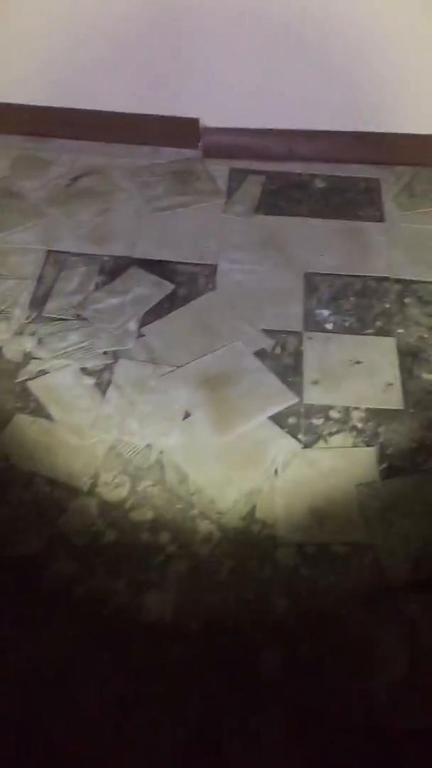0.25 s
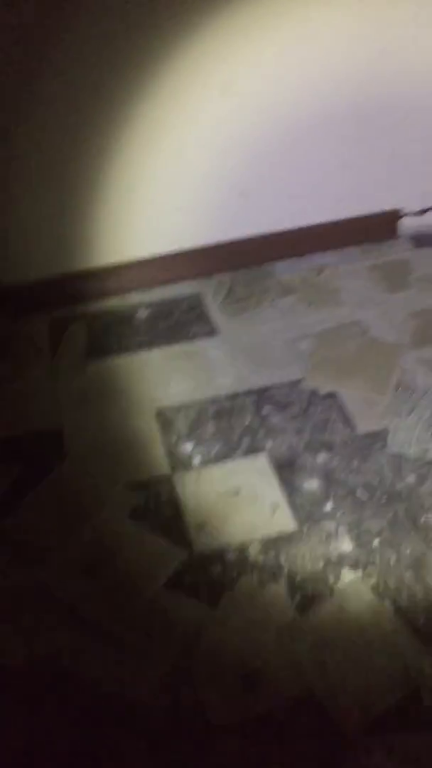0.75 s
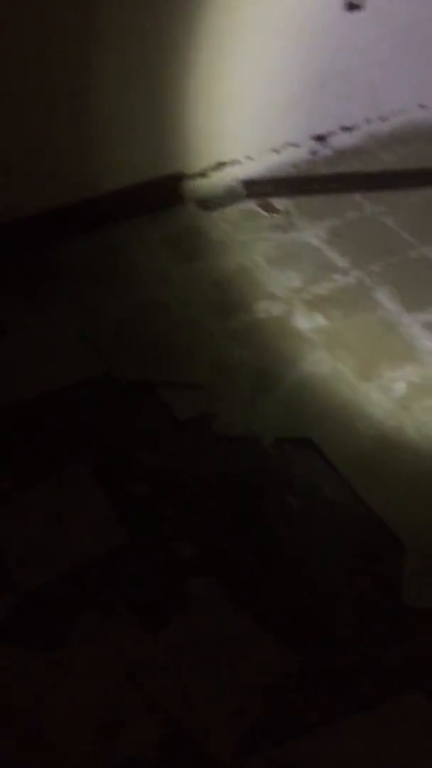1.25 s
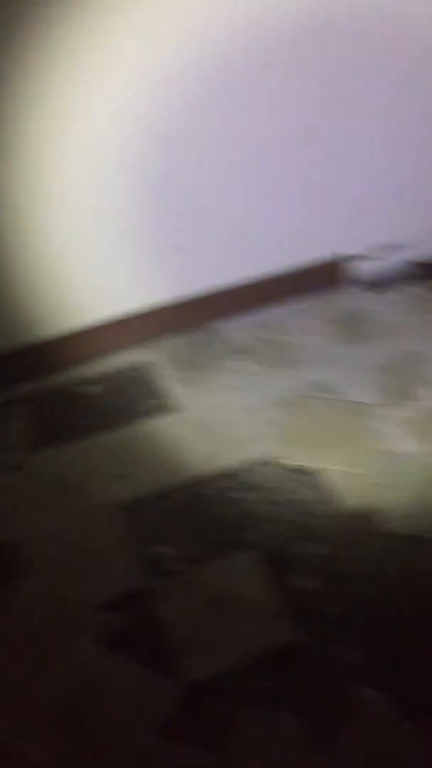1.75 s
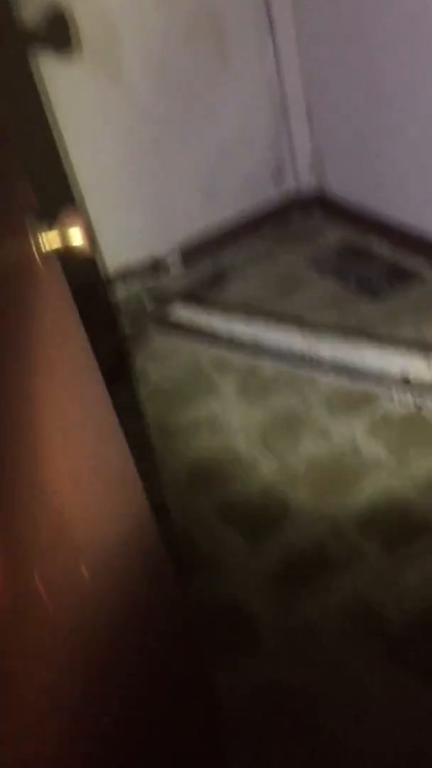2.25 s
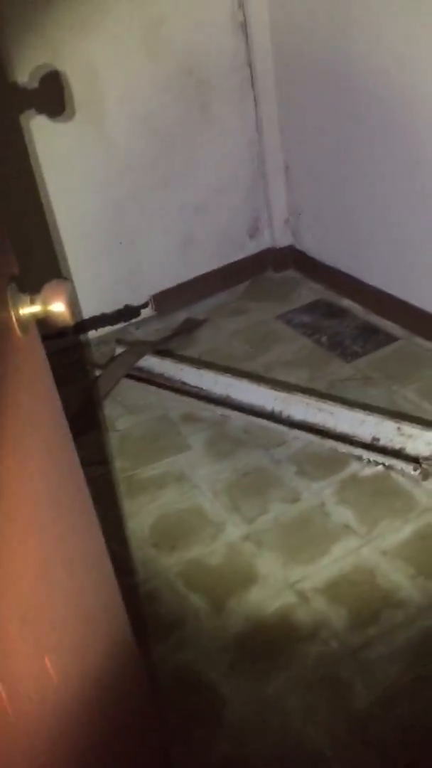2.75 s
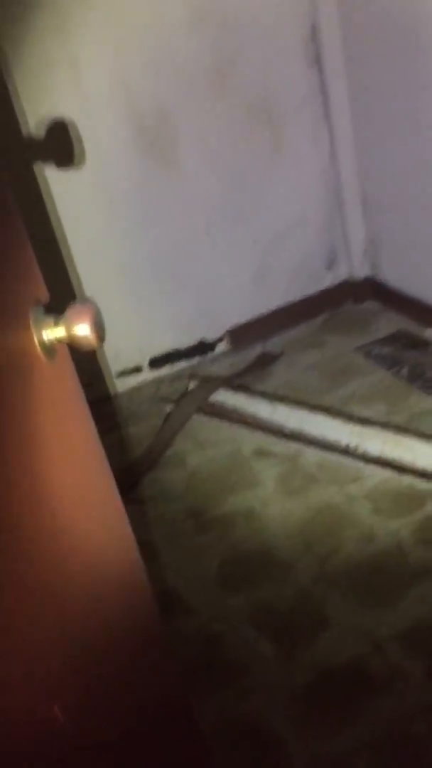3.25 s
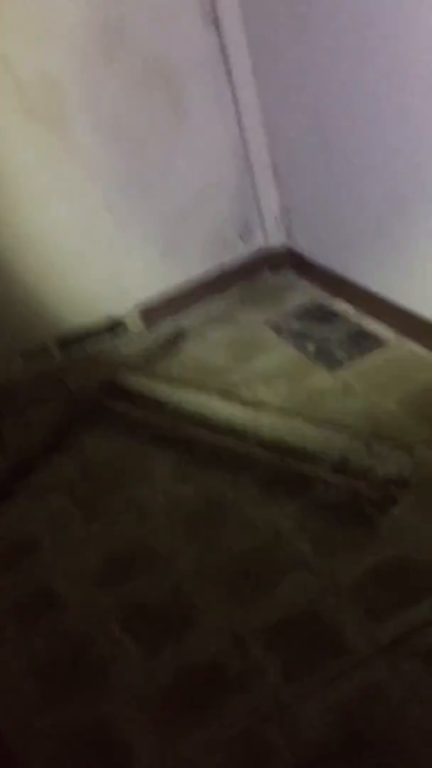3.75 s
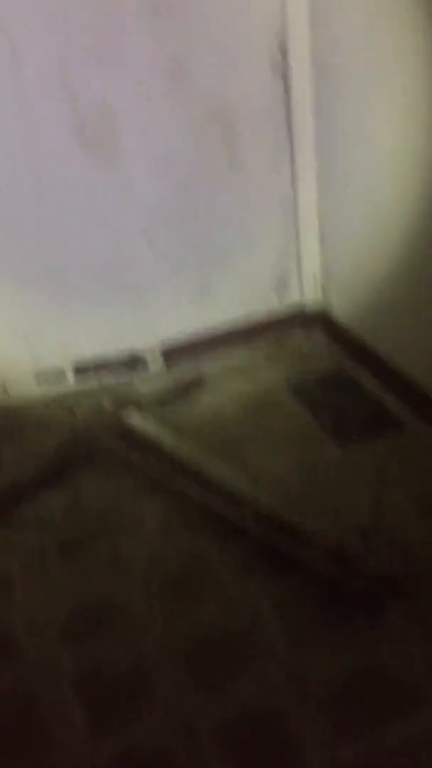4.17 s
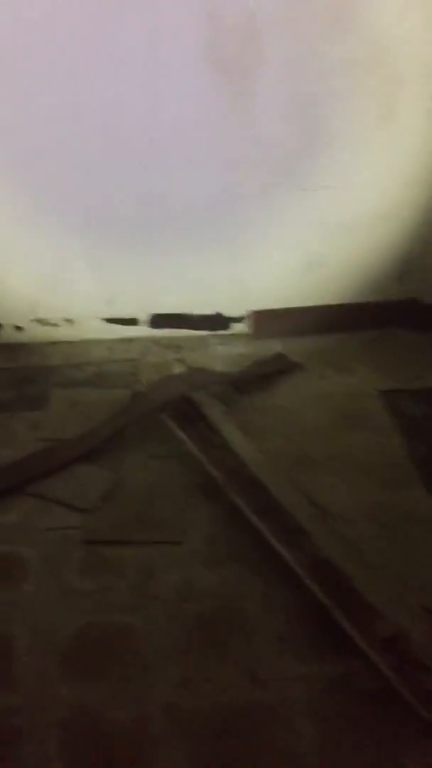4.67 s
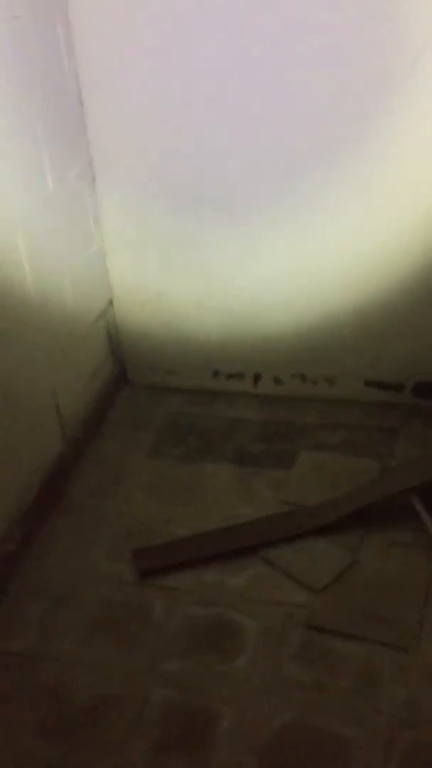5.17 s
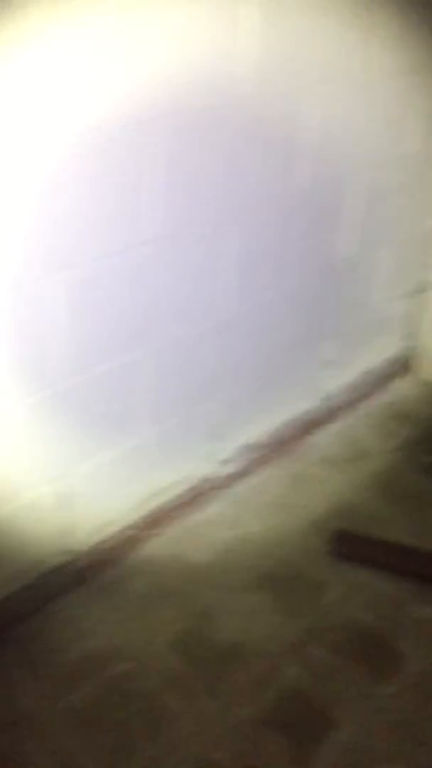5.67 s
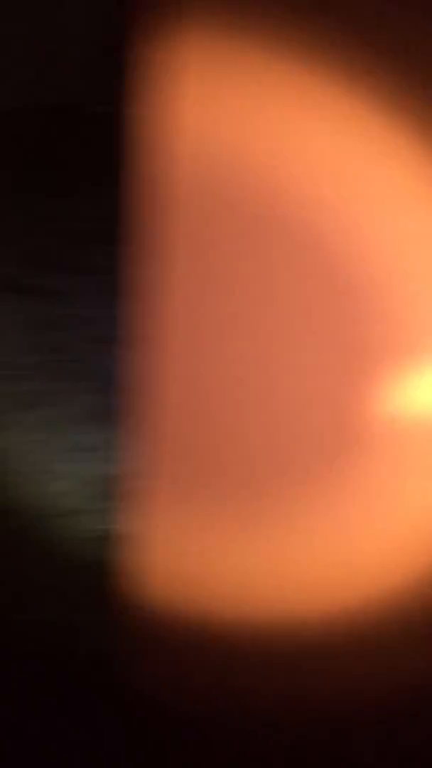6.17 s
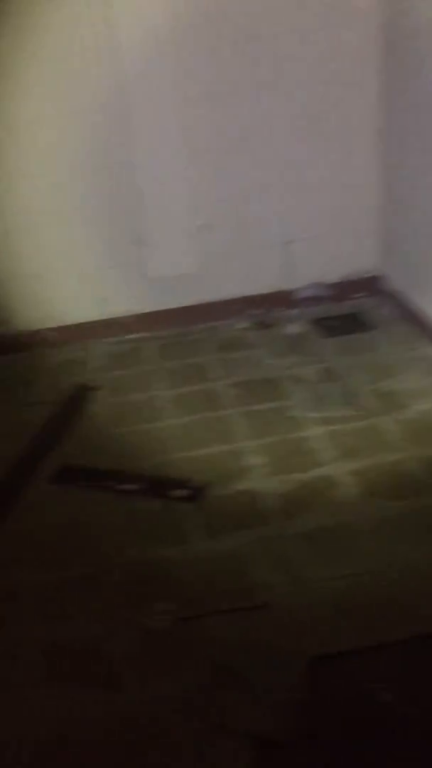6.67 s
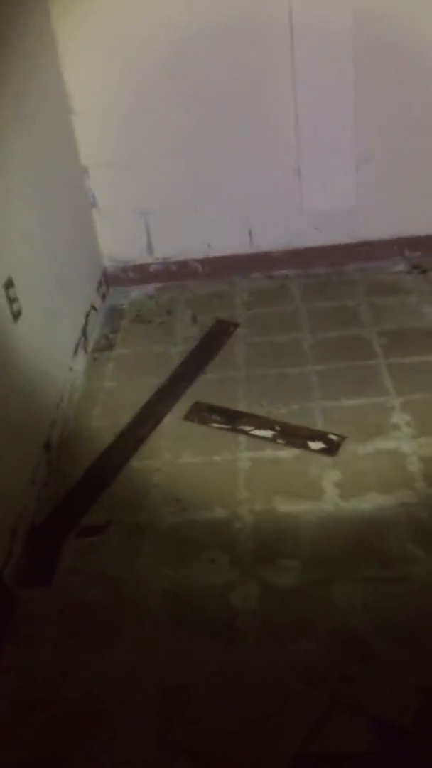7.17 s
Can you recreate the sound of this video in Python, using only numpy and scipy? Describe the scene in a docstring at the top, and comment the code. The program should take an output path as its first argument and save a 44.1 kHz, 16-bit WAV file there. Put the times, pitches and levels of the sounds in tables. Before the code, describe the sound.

Near-field footsteps on loose brittle tiles in bare, echoing rooms, over faint hiss and low rumble. At the start a sole scuffs briefly and a small shard clinks near 0.1 s. A modest clack comes at 0.4 s, then small clicks lead to a loud, sharp tile snap with a hollow heel knock at 0.8 s, its echo fading. A soft low thud falls around 1.65 s. Until about 3.6 s it is nearly still, with a faint hollow drone near 3 s. Light gritty shuffles follow at 3.6-3.9 s. From 4.4 to 4.65 s tiles crack in a dense crunching burst, with another strong clack at 5.0 s and low hand rumble. Scrapes and smaller snaps cluster at 5.4-5.8 s, then again at 6.25-6.9 s. Grit whispers quietly before a last scuff and deep thud at 7.4 s. The later echoes are shorter, suggesting a smaller room.

```python
"""Footsteps on broken tiles

Someone walks over loose brittle tiles and grit in bare, echoing rooms, stops a while and walks on.
Tiles snap and clack as ringing bursts, soles drag through random grit clicks, heels thud as short low tones.
A small shard clinks, bare walls answer with dying noise, and rumble, a faint drone and hiss lie beneath."""
import sys
import numpy as np
from scipy import signal
from scipy.fft import rfft, irfft
from scipy.io import wavfile
from scipy.ndimage import uniform_filter1d

SR = 44100
rng = np.random.default_rng(int(sys.argv[2]) if len(sys.argv) > 2 else 0)


def unload_wav(signal):
    """Save mono or channel-first audio to the path in sys.argv[1] as 16-bit WAV at rate SR, clipped to [-1, 1]."""
    wavfile.write(
        sys.argv[1],
        SR,
        np.round(np.clip(np.atleast_2d(signal).T, -1, 1) * 32767).astype(np.int16),
    )


def ratio(d):
    """dB to gain"""
    e = np.asarray(d, float) / 20
    return 10 ** e


N = 327212  # length in samples


def rms_one(x):
    """Scales a sound to an rms of one."""
    return x / np.sqrt(np.mean(x ** 2) + 1e-20)


def peak_one(x):
    """Scales a sound to a peak of one."""
    return x / np.max(np.abs(x))


def at_hz(points, hz):
    """Reads a table of (f/Hz, value) between its rows, along a logarithmic pitch scale."""
    table_hz, values = np.transpose(points)
    return np.interp(np.log(hz), np.log(table_hz), values)


def band(x, low_hz, high_hz):
    """Keeps only the sound between two frequencies."""
    sos = signal.butter(2, [low_hz, min(high_hz, .45 * SR)], "band", fs=SR, output="sos")
    return signal.sosfilt(sos, x)


def slow_noise(shape, top_hz):
    """Noise that wanders no faster than about top_hz."""
    sos = signal.butter(2, top_hz, fs=SR, output="sos")
    return signal.sosfilt(sos, rng.standard_normal(shape))


def ring(x, hz, cycles):
    """A mode that dies by 60 dB within the given number of cycles."""
    radius = ratio(-60 * hz / (cycles * SR))
    angle = 2 * np.pi * hz / SR
    return signal.lfilter([0, np.sin(angle)], [1, -2 * radius * np.cos(angle), radius ** 2], x + 1e-18)


def add(out, s, sound):
    """Mixes a short sound into a track at a time in seconds."""
    at = max(round(s * SR), 0)
    out[at:at + len(sound)] += sound[:N - at]


def swell(s, hold_s, db, rise, fall):
    """Gain that climbs to a level, holds it and dies, at steady rates in dB per second."""
    t = np.arange(N) / SR
    return ratio(db - rise * np.maximum(s - t, 0) - fall * np.maximum(t - s - hold_s, 0))


def hump(f, hz, octaves):
    """Power of a resonance with steep skirts; octaves sets how wide it is."""
    return 1 / (1 + (np.log2(f / hz) / octaves) ** 2 / 2) ** 4


def tile(force, power):
    """Colours a force by a power spectrum with the causal, minimum-phase response."""
    folded = irfft(.5 * np.log(power))
    half = len(folded) // 2
    folded[1:half] *= 2
    folded[half + 1:] = 0
    return irfft(np.exp(rfft(folded)) * rfft(force))


# tile snaps and clacks, strengths before the offsets in snaps():
# (t/s, level/dB, lower ring f/Hz, upper ring level/dB, bright crack level/dB)
TILE_SNAPS = [(0.034, -36, 1140, -1, -11), (0.087, -34.5, 4020, -20, 12), (0.094, -29, 1100, 12, -14),
              (0.421, -18, 1275, -23.5, -65), (0.442, -23, 1240, -28.5, -54.5), (0.715, -41, 1000, -3, -18),
              (0.729, -42, 3000, -8, 4), (0.752, -22.5, 1010, -2.5, -8), (0.763, -18, 1780, -2, -10),
              (0.787, -32, 2100, 6.5, -15), (0.822, 1, 1546, -4, -5), (1.639, -49.5, 813, -26, -31),
              (2.655, -52, 2003, -5, -15), (3.387, -46.5, 680, -20, -20), (3.39, -46.5, 2340, -20, -28),
              (3.595, -37.5, 1275, 1, -19), (3.69, -52, 1180, -18, -7.5), (4.134, -37, 2360, 19, -13),
              (4.399, -21.5, 1840, -8, 6), (4.423, -17.5, 1730, -14, 6), (4.461, -22.5, 1960, -13.5, -11),
              (4.486, -18.5, 2050, 7.5, -32), (4.504, -12, 1360, -3, -12), (4.537, -7.5, 1920, -22, -15),
              (4.541, -8.5, 1156, 7, -30), (4.587, -7, 1200, -13, 12), (4.61, -7, 1200, -20, -15),
              (4.615, -22, 1300, -20, -21), (4.911, -26.5, 1300, -7, 13), (4.987, -2.5, 1230, -1, -6),
              (4.992, -15, 722, -20, -28), (5.411, -35, 2010, -5, -2), (5.45, -31, 1210, -5, 12),
              (5.505, -25.5, 2110, -14.5, -8), (5.514, -29, 4000, -10, 3), (5.541, -22, 930, -7, 4),
              (5.575, -26, 800, -10, -5), (5.69, -34.5, 830, -20, -21), (5.728, -28.5, 1170, 10, 5),
              (5.801, -11, 1630, -3, -1), (5.81, -20, 2400, -6, -10), (6.253, -40, 1292, -21, -38.5),
              (6.326, -18, 1390, -4, -8), (6.334, -11.5, 1600, 0, -7.5), (6.421, -17, 1010, -20, -9),
              (6.439, -15.5, 1084, -14, 2), (6.505, -24.5, 890, -20, -18), (6.531, -21, 1420, -10, -2),
              (6.819, -30, 1460, -6.5, -4), (7.148, -49, 1230, 10, 5.5), (7.331, -46.5, 2250, -0.5, 1),
              (7.381, -32, 2140, -3, -4)]


def snaps():
    """A fracture shakes two modes of the tile; the sharper its crack, the more broad slap lies under them.
    Heard directly it tears for a few milliseconds; summed over all directions it is one smooth click."""
    upper_hz, crack_hz = 2783, 5800
    direct, spread, t = np.zeros(N), np.zeros(N), np.arange(2048) / SR
    f = np.linspace(0, SR / 2, 1025) + 10
    click = (t == 0) * 1.0
    for s, db, low_hz, high_db, crack_db in TILE_SNAPS:
        tear_s = .003 - .00016 * db  # weak fractures crumble longer
        tear = rng.standard_normal(len(t)) * (1 - np.exp(-t / .0004)) * np.exp(-t / tear_s)
        power = hump(f, low_hz, octaves=0.46)
        # sharp cracks add a narrow ring
        power += ratio(.15 * crack_db + 5.5) ** 2 * hump(f, low_hz, octaves=0.095)
        power += ratio(high_db - 6.5) ** 2 * hump(f, upper_hz, octaves=0.37)
        power += ratio(crack_db - 7) ** 2 * hump(f, crack_hz, octaves=0.37)
        # broad slap between the two rings
        power += ratio(0.63 * crack_db - 1.5) ** 2 * hump(f, np.sqrt(low_hz * upper_hz), octaves=1.66)
        # strong snaps are nearer: more direct sound
        direct_db = db + 6.5 + 0.14 * db
        add(direct, s - .001, ratio(direct_db) * peak_one(tile(tear, power)))
        add(spread, s, ratio(db - 12.5) * rms_one(tile(click, power)))
    return direct, spread


# heel weight on the floor, the knock relative to the push:
# (t/s, push level/dB, f/Hz, length/s, hollow knock level/dB)
HEEL_THUDS = [(0.422, -46, 161, 0.029, 14.5), (0.759, -48, 156, 0.047, 12), (0.819, -31, 203, 0.022, 16.5),
              (1.631, -44, 132, 0.043, -17.5), (1.689, -44, 156, 0.02, -9), (2.989, -66.5, 159, 0.027, 7.5),
              (3.639, -54, 59.2, 0.027, -3.5), (3.649, -51, 302, .02, 2), (3.697, -57.5, 303, .025, 0),
              (3.722, -52, 57.7, 0.026, -18), (3.929, -52, 65.8, 0.027, -21),
              (4.399, -51, 199, 0.017, 12.5), (4.459, -41, 185, 0.051, 12.5), (4.534, -36, 143, 0.028, 3.5),
              (4.984, -32.5, 184.3, 0.11, 20.5), (5.328, -40, 151, 0.038, 12),
              (5.499, -47.5, 146, 0.033, 6), (5.599, -37, 149, 0.009, -19),
              (5.814, -37.5, 199, 0.016, 10.5), (6.249, -45, 61, 0.037, -2.5), (6.325, -35.5, 80, 0.015, 4),
              (6.615, -66, 114, 0.027, -8), (7.234, -46, 56.7, 0.018, -16), (7.349, -44.5, 76, 0.027, -40),
              (7.374, -33.5, 66.5, 0.026, -14)]


def thuds():
    """A soft push gives a few low cycles, felt through the hand, and a hollow knock that fills the room."""
    low, knock, t = np.zeros(N), np.zeros(N), np.arange(8192) / SR
    click = (t == 0) * 1.0
    hollow = peak_one(band(band(click, 93, 640), 93, 640))
    for s, db, hz, length_s, knock_db in HEEL_THUDS:
        push = peak_one(t * np.exp(-2.5 * t / max(length_s, .005)))
        add(low, s, ratio(db) * push * np.sin(2 * np.pi * hz * t))
        add(knock, s, ratio(db + knock_db) * hollow)
    return low, knock


# soles dragging through grit, one row a stroke, the dust relative to the stroke:
# (start t/s, hold/s, level/dB, grain f/Hz, fine dust level/dB)
SOLE_DRAGS = [(0, 0.047, -48, 1440, -16.5), (0.719, 0.0085, -53.5, 1780, -3.5),
              (0.757, 0.0041, -28.5, 1840, -8), (3.172, 0.079, -73.5, 2023, 3),
              (3.615, 0.074, -54.5, 1400, -19), (3.688, 0.14, -61.5, 1520, 0), (4.408, 0.082, -39, 1910, 2),
              (4.538, 0.024, -26.5, 1590, 8), (4.6, 0.069, -45.5, 1400, 15.5),
              (5.389, 0.055, -44.5, 1506, -10), (5.531, 0.06, -39, 1410, -1), (5.615, 0.096, -50, 1310, -6),
              (6.254, 0.096, -46.5, 1300, -9), (6.34, 0.018, -24.5, 1870, -4),
              (6.382, 0.061, -35.5, 1530, 2), (6.507, .05, -40.5, 1330, 5.5),
              (6.579, 0.083, -46.5, 1640, 0.5), (6.732, 0.057, -46, 1440, -13),
              (6.804, 0.025, -40, 1600, -24), (6.846, 0.023, -58, 1620, 5.5), (7.072, 0.56, -71, 2000, 3.5),
              (7.38, .04, -45.5, 2310, -0.5)]


def drags():
    """Grit grains click at random and ring a few cycles near the grain pitch; dust hisses on top."""
    grains_per_s, lump_db, lump_top_hz = 2700, 1, 23
    grain_hz = np.geomspace(750, 6500, 14)
    grit_gain, dust_gain = np.zeros((14, N)), np.zeros(N)
    for s, hold_s, db, hz, dust_db in SOLE_DRAGS:
        stroke = swell(s, hold_s, db, rise=1499.5, fall=598.5)
        on = slice(max(round((s - .1) * SR), 0), round((s + hold_s + .2) * SR))
        near = ratio(-5.0 * np.abs(np.log2(grain_hz / hz)))  # grains far from the grain pitch are weaker
        grit_gain[:, on] += np.outer(near / np.linalg.norm(near), stroke[on])
        dust_gain += ratio(dust_db) * stroke

    sizes = ratio(3.2 * np.minimum(rng.exponential(1, N), 5)) * rng.choice([-1, 1], N)
    clicks = sizes * (rng.random(N) < grains_per_s / SR)
    dealt = rng.integers(0, 14, N)  # each click goes to one of the 14 pitches
    grit = np.zeros(N)
    for k, hz in enumerate(grain_hz):
        grit += grit_gain[k] * rms_one(ring(clicks * (dealt == k), hz, cycles=8.7))
    dust = rms_one(band(rms_one(clicks) + 0.99 * rng.standard_normal(N), 3500, 11000))
    lumps = rms_one(slow_noise(N, lump_top_hz))  # makes the drag uneven
    return ratio(lump_db * lumps) * (grit + dust_gain * dust)


# taps on a small hard shard: (t/s, level/dB)
SHARD_TAPS = [(.097, -23.5)]
# modes of the shard: (f/Hz, level/dB, time to die by 60 dB/s)
SHARD_MODES = [(1130, -3, .022), (2850, -.5, .014), (4100, -5, .014), (5900, -9, .014)]


def clink():
    """One tap sets all modes of the shard ringing."""
    taps = np.zeros(N)
    for s, db in SHARD_TAPS:
        taps[round(s * SR)] = ratio(db)
    return sum(ratio(db) * ring(taps, hz, cycles=hz * t60) for hz, db, t60 in SHARD_MODES)


# echo decay of the bare walls, before each room's share: (f/Hz, time to die by 60 dB/s)
WALL_DECAY = [(100, 1.1), (260, 2.1), (700, 1.61), (1840, 1.21), (4850, 1.127), (9500, 0.95), (14000, 0.6)]


def room(x, share):
    """Echoes thicken within milliseconds into noise that dies band by band; share scales the decay times."""
    t, tail = np.arange(2 * SR) / SR, 0
    edges = 60 * 2 ** np.arange(0, 8.6, .5)  # half octaves, in Hz
    white = rng.standard_normal((2, len(t)))
    for k, (low, high) in enumerate(zip(edges, edges[1:])):
        t60 = share * at_hz(WALL_DECAY, np.sqrt(low * high))
        tail = tail + band(white[k % 2], low, high) * ratio(-60 * t / t60)
    tail *= np.clip((t - .003) / .006, 0, 1)  # silent for 3 ms, then full within 6 ms
    return signal.fftconvolve(x, tail / np.sqrt(np.sum(tail ** 2)))[:N]


# low floor rumble: (t/s, level/dB)
FLOOR_LEVEL = [(0.06, -66), (.5, -88), (.82, -73), (1.45, -88.5), (2.2, -84.5), (3.4, -85.5), (3.9, -73),
               (4.35, -85.5), (4.67, -54.5), (4.95, -61), (5.13, -46), (5.3, -58), (5.64, -55.5),
               (5.74, -71), (5.85, -50.5), (6.05, -82), (6.4, -65), (6.95, -92), (7.42, -67.5)]
# the hand shifts on the microphone: (t/s, level/dB)
HAND_SHIFTS = [(.3, -77), (.8, -68), (1.45, -80), (3.74, -58), (3.93, -61), (4.44, -59.5), (4.67, -55),
               (5.05, -44), (5.45, -57), (5.64, -56), (5.85, -53), (6.32, -47), (6.46, -48), (6.63, -59),
               (6.88, -64), (7.23, -66), (7.39, -49.5)]
# a faint hollow drone: (t/s, level/dB)
DRONE_LEVEL = [(1.9, -77), (2.24, -77), (2.53, -79.5), (2.85, -68.5), (2.97, -68), (3.22, -78), (3.78, -72),
               (4.19, -78), (4.4, -76)]


def rumble():
    """Noise through a low resonance, deep noise from the hand below it and a narrow drone above."""
    floor_hz, drone_hz, hand_rest_db = 91, 352, -85.5
    t = np.arange(N) / SR
    wobble = slow_noise((2, N), 9.0)
    # a low tone whose strength and phase wander at random sounds like narrow noise
    tone = np.exp(2j * np.pi * floor_hz * t)
    floor = rms_one(np.real(tone * (0.021 + wobble[0] + 1j * wobble[1])))
    floor_gain = ratio(np.interp(t, *np.transpose(FLOOR_LEVEL)))

    hand = rms_one(band(rng.standard_normal(N), 43, 70))
    grip = ratio(hand_rest_db) + sum(swell(s, 0, db, rise=201.5, fall=250) for s, db in HAND_SHIFTS)

    drone = rms_one(ring(rng.standard_normal(N), drone_hz, cycles=75.0))
    drone_gain = ratio(np.interp(t, *np.transpose(DRONE_LEVEL), left=-90, right=-90))
    return floor_gain * floor + grip * hand + drone_gain * drone


# colour of still air and microphone hiss, relative density: (f/Hz, level/dB)
HISS_COLOUR = [(18, -35.5), (30, -6), (233, -1), (473, -9.5), (1040, -9.5), (1390, -10.5), (1910, -10),
               (4910, -18), (8980, -21), (10500, -23), (13700, -24), (14800, -30), (16000, -60.5)]
# distant murmur of the building swelling and fading, relative: (t/s, level/dB)
MURMUR_SWELL = [(0, 0.5), (1.8, 1.8), (2.3, -3), (2.7, 0.8), (3.3, 0.4), (4.3, 5), (6.998, -2.5),
                (7.42, 0.5)]


def quiet():
    """Half-octave bands of steady noise; the lower bands swell slowly."""
    typical_db = -67.5  # median sample height
    edges = 25 * 2 ** np.arange(0, 9.6, .5)
    white, out = rng.standard_normal((2, N)), 0
    swell_db = np.interp(np.arange(N) / SR, *np.transpose(MURMUR_SWELL))
    for k, (low, high) in enumerate(zip(edges, edges[1:])):
        hz = np.sqrt(low * high)
        band_db = at_hz(HISS_COLOUR, min(hz, 14000)) + swell_db / (1 + hz / 3000)
        out = out + ratio(band_db) * band(white[k % 2], low, high)
    return ratio(typical_db) * out / np.median(np.abs(out))


def scene():
    """Steps sound near at hand and echo from the room the walker is in; background lies under all."""
    doorway_s = 2.5
    low, knock = thuds()
    direct, spread = snaps()
    both = knock + drags() + clink()
    high_pass = signal.butter(4, 120, "high", fs=SR, output="sos")
    near, feed = signal.sosfilt(high_pass, [direct + both, spread + both])
    first = np.arange(N) < doorway_s * SR  # the walker moves on into a smaller room
    echo = ratio(-0.5) * room(feed * first, share=0.84)
    echo += ratio(-1) * room(feed * ~first, share=0.57)
    return (near + echo + low + rumble() + quiet())[None]


def gain_control(x, threshold_db, slope, release_db_per_s):
    """Loud sounds turn the gain down within tens of milliseconds; it creeps back at a steady rate."""
    power = uniform_filter1d(x ** 2, size=441, origin=220)  # mean over 10 ms
    level_db = 10 * np.log10(power + 1e-12)
    climb = release_db_per_s * np.arange(N) / SR
    wanted_db = slope * np.maximum(level_db - threshold_db, 0)
    cut_db = np.maximum.accumulate(wanted_db + climb) - climb
    r = np.exp(-1 / (0.036 * SR))  # smooths the cut over 36 ms
    return x * ratio(-signal.lfilter([1 - r], [1, -r], cut_db))


def top_cut(x):
    """Nothing passes above the cut-off."""
    return signal.sosfilt(signal.butter(12, 16430, fs=SR, output="sos"), x)


def record(dry):
    """The microphone port dips in the treble, gain control rides the level, the top is cut, peaks clip."""
    notch_hz, notch_width_hz, notch_depth = 10470, 960, 0.47
    dip = signal.lfilter(*signal.iirpeak(notch_hz, notch_hz / notch_width_hz, fs=SR), dry[0])
    heard = dry[0] - notch_depth * dip
    held = gain_control(heard, threshold_db=-29, slope=0.32, release_db_per_s=15.0)[None]
    cut = signal.sosfilt(signal.cheby2(10, 50, 15900, fs=SR, output="sos"), held)  # 50 dB down from 15.9 kHz
    mix = np.clip(cut, -1, 1)  # sound beyond full scale overloads
    return top_cut(mix)


dry = scene()
out = record(dry)
unload_wav(out)
```